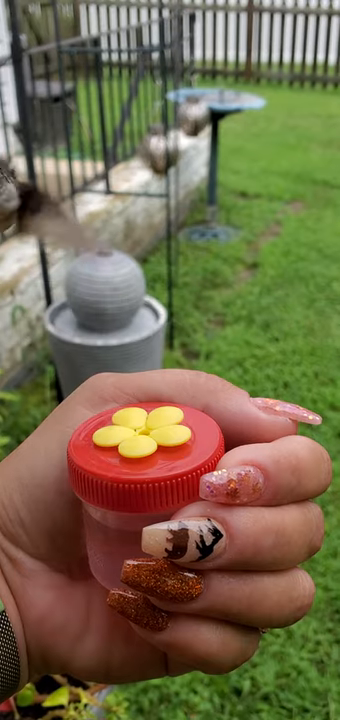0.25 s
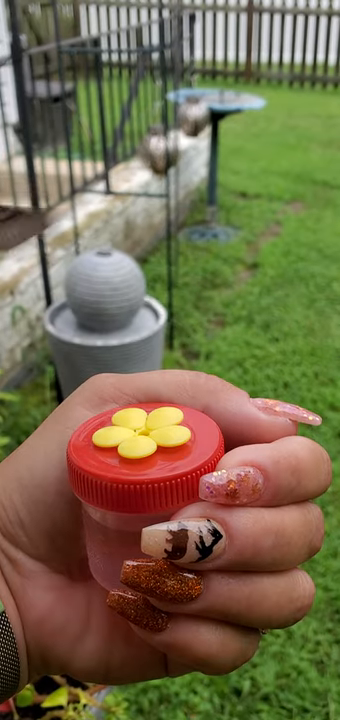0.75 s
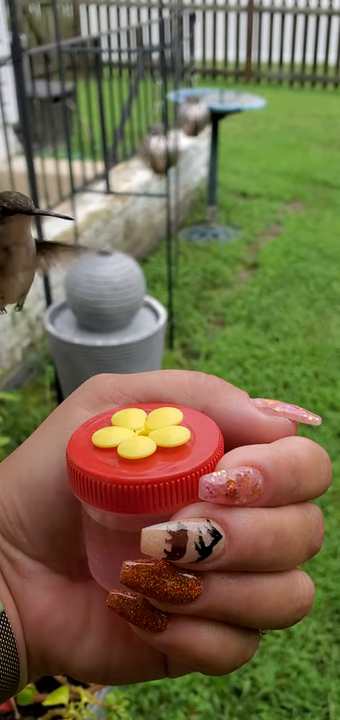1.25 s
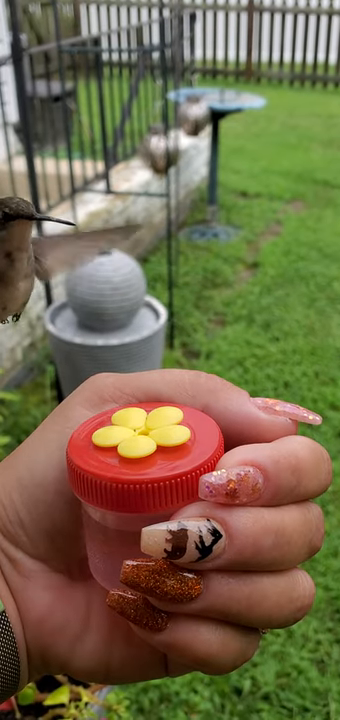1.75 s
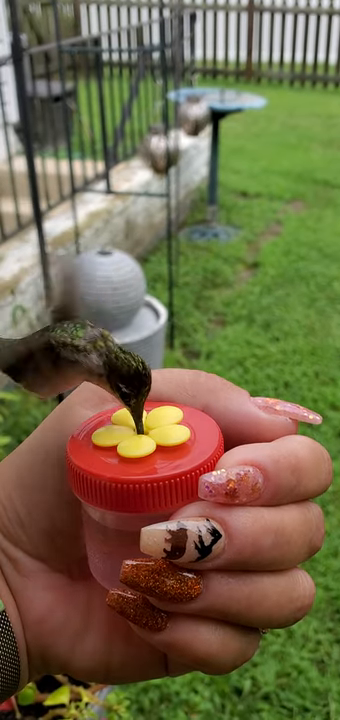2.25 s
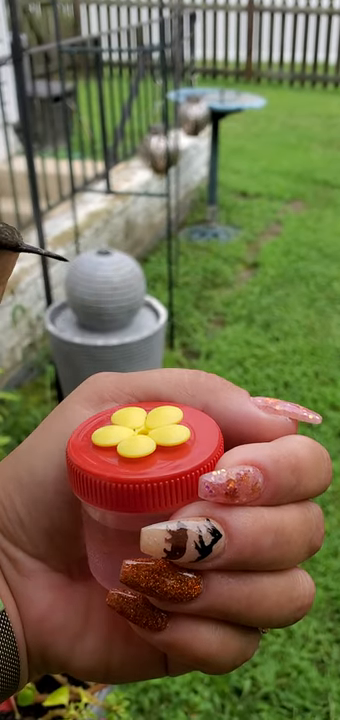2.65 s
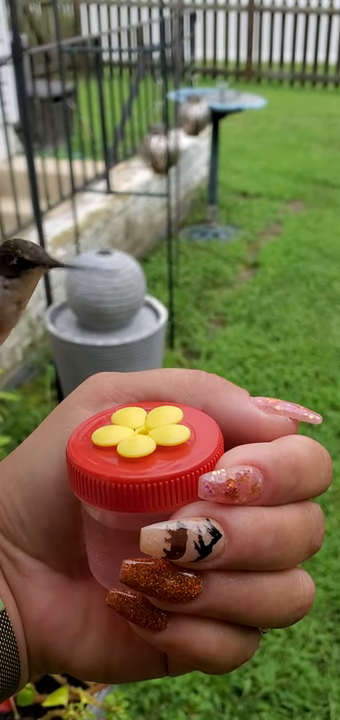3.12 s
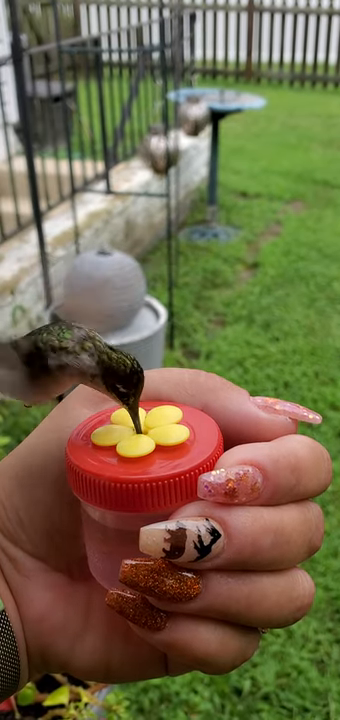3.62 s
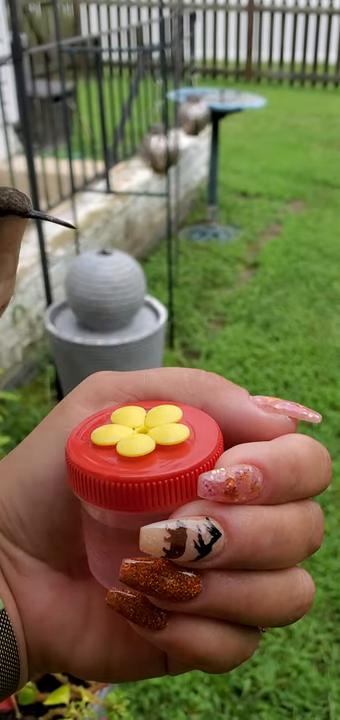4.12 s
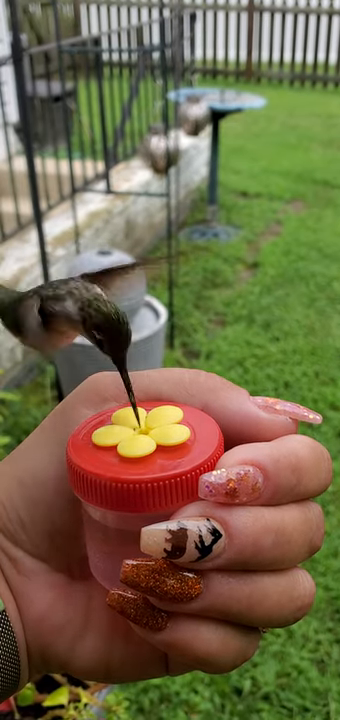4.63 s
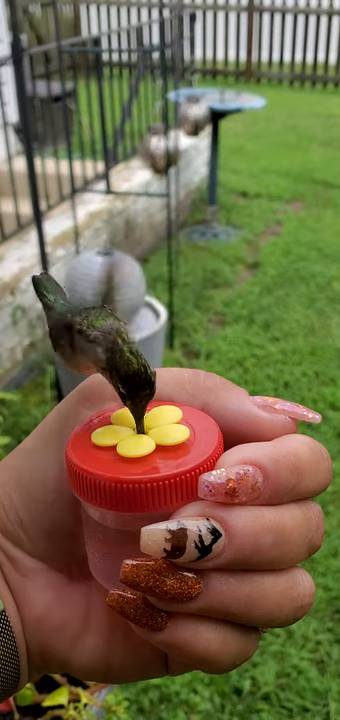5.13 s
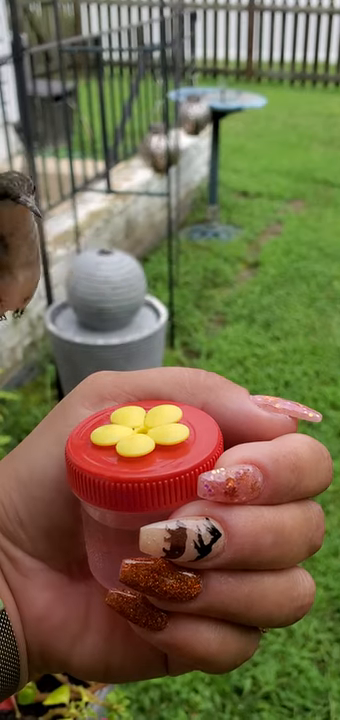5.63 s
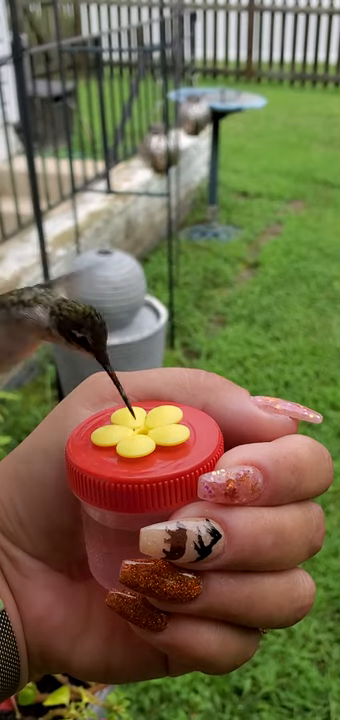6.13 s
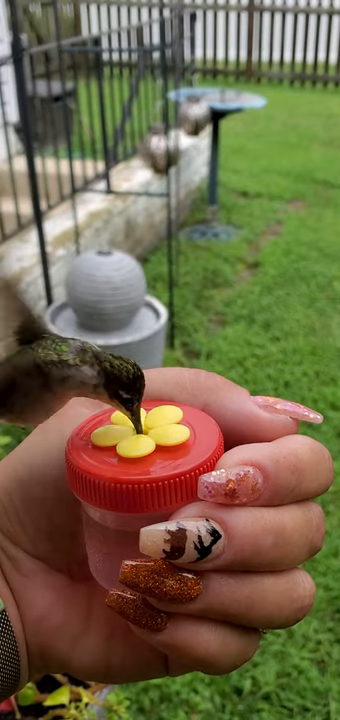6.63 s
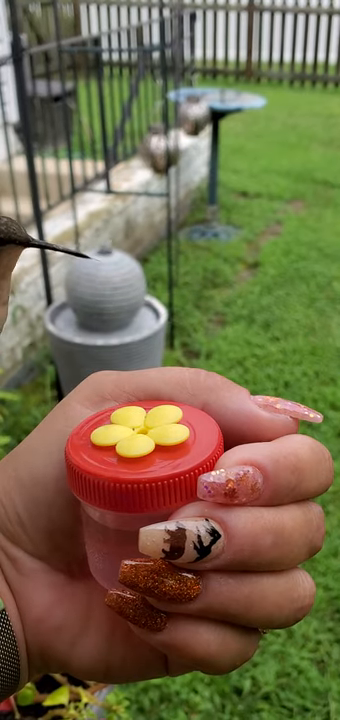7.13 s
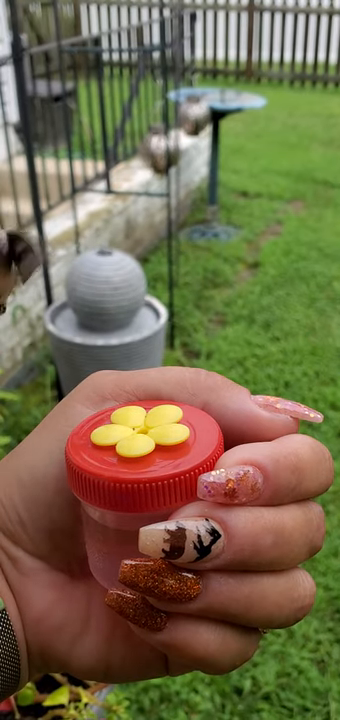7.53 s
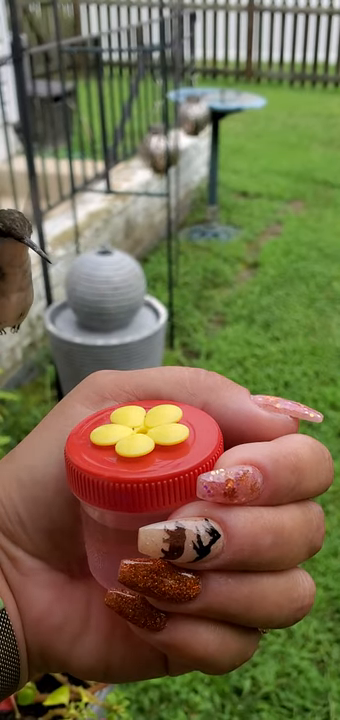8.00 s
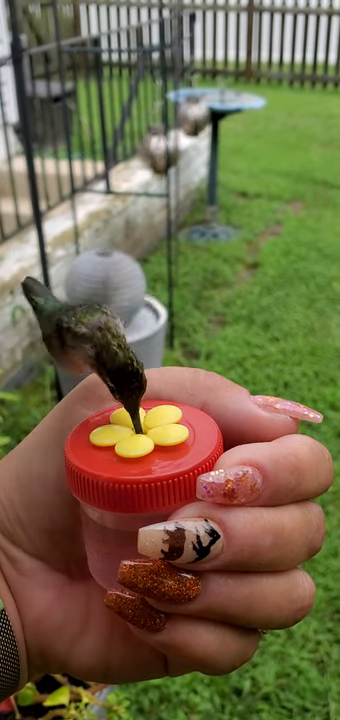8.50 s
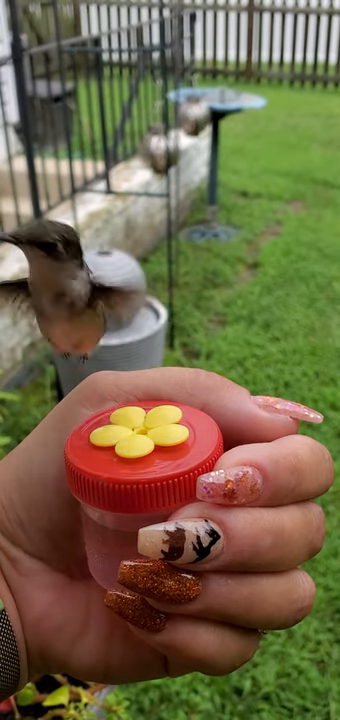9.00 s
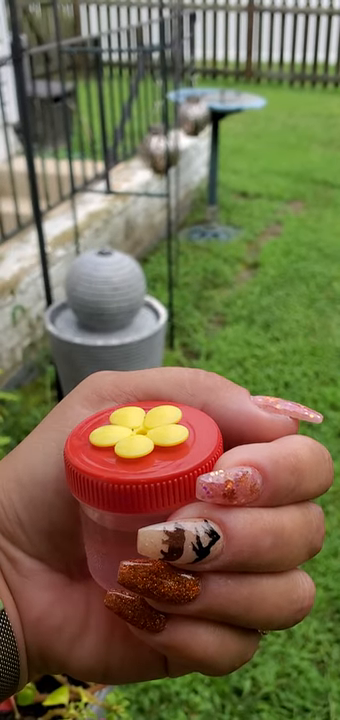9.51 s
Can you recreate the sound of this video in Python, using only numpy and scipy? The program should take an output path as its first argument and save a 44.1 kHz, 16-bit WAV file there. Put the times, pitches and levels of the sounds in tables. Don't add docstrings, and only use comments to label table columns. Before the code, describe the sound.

A hummingbird's wings hum low and throaty right beside the microphone, surging as it darts, with two sharp chips over faint crickets, then it leaves.

```python
import sys
import numpy as np
from scipy import signal
from scipy.fft import rfft, irfft, next_fast_len
from scipy.io import wavfile

SR = 44100
rng = np.random.default_rng(int(sys.argv[2]) if len(sys.argv) > 2 else 0)


def how_loud(loudness_db):
    steps = np.asarray(loudness_db, float) / 20
    return 10 ** steps


def int16_out(signal):
    q = np.round(np.clip(np.atleast_2d(signal).T, -1, 1) * 32767)
    wavfile.write(sys.argv[1], SR, q.astype(np.int16))


N = 430416


def unit(x):
    return x / np.sqrt(np.mean(x ** 2) + 1e-20)


def along(points, hz):
    f, v = np.transpose(points)
    return np.interp(np.log(hz + 1), np.log(f + 1), v)


def wobble(rate):
    knots = rng.standard_normal(int(N * rate / SR) + 4)
    return np.interp(np.arange(N) * rate / SR, np.arange(len(knots)), knots)


def rush(spectrum, alike, lean=((1, 0), (2, 0))):
    m = next_fast_len(N)
    hz = np.fft.rfftfreq(m, 1 / SR)
    common, difference = rng.standard_normal((2, m))
    turn = np.arccos(np.clip(alike, -1, 1)) / 2
    pair = np.cos(turn) * common + np.sin(turn) * np.outer([1, -1], difference)
    in_band = (hz > spectrum[0][0]) & (hz < spectrum[-1][0])
    gain = in_band * how_loud(along(spectrum, hz) + np.outer([.5, -.5], along(lean, hz)))
    lead = np.exp(1j * np.pi * np.outer([1, -1], hz) * 0.000265)
    return unit(irfft(rfft(pair) * gain * lead, m)[:, :N])


def wings():
    # multiple, left_db, right_db, right_lag_rad
    overtones = [(3, -8, -4.5, 1.18), (4, -4, -13.5, 2), (5, -5.5, -6, 0.4), (6, -13, -13, 2.1),
                 (7, -13.5, -10, 0.086), (8, -10.5, -21, 3), (9, -28, -28, 0.34), (10, -19.5, -28, 3.1)]
    # pitch_hz, density_db_per_hz
    wash = [(25, -34), (45, 7), (110, 2.5), (250, -1.5), (420, -12), (520, -21.5), (900, -23.5),
            (1400, -48)]
    # time_s, level_db
    gusts = [(.1, -46), (1.85, -56.5), (2.5, -49), (3.81, -51), (4.66, -51.5), (5.279, -47), (8.33, -51),
             (9.0, -49), (9.23, -48.5), (9.43, -48.5)]
    t = np.arange(N) / SR
    hz, stroke_db, share, left_db, right_db, lag, over_db = flight()
    phase = 2 * np.pi * np.cumsum(hz * (1 + 0.00385 * wobble(25))) / SR

    out = np.sqrt(2) * how_loud(stroke_db) * np.sin(phase) * np.array([share, np.ones(N)])
    lift_level = how_loud([left_db + 0.51 * wobble(13), right_db + 2.8 * wobble(14)])
    lift_lag = np.array([0 * lag, lag + 0.29 * wobble(6)])
    out += np.sqrt(2) * lift_level * np.sin(2 * phase + lift_lag)

    facing = np.clip(share, 0, 1) - .4
    odd_db = 3 * facing
    even_db = 0.76 * (left_db + 41.5) - 13 * facing
    for k, l_db, r_db, behind in overtones:
        drift = .5 * wobble(3)
        if k == 3:
            r_db = r_db + 1.23 * (stroke_db + 50.0)
        waver_db = 1.5 * np.array([wobble(4), wobble(4)])
        sway_db = np.array([l_db + waver_db[0], r_db + waver_db[1]])
        sway_db += odd_db if k % 2 == 1 else even_db
        out += np.sqrt(2) * how_loud(over_db + sway_db) * np.cos(k * phase + drift + np.array([[0], [behind]]))

    steady = how_loud(over_db - 10 + 2 * wobble(12))
    puffs = sum(how_loud(db) * np.exp(-.5 * ((t - at) / 0.054) ** 2) for at, db in gusts)
    half_strokes = 1 + 1.03 * np.cos(2 * phase)
    return out + (steady + puffs) * half_strokes * rush(wash, alike=0.95)


def flight():
    # time_s, beat_hz, facing, stroke_db, nearness_db
    hover = [(0, 48.6, 0.45, -49, 1), (.85, 49.3, 0.94, -48.5, -2), (1.1, 49, 0.46, -50.5, -1),
             (1.65, 46, 0.49, -47, -1), (2.1, 48, -0.15, -43.5, -1), (2.75, 49.8, 0.62, -47.5, 0.5),
             (2.95, 47.6, .3, -43, 2), (3.1, 48.6, -0.13, -47, 0.5), (3.45, 48, -0.19, -42.5, 1),
             (3.75, 48, -0.02, -51, 0.5), (4.35, 45.2, .6, -48.5, -1), (4.9, 48.6, .4, -42.5, 1.5),
             (5.9, 45.5, 0.38, -51.5, -0.5), (6.5, 48.4, -0.51, -52, 1.5), (7.25, 45.9, 0.66, -53.5, 0),
             (8.1, 45.5, 0.53, -49, -1), (8.75, 50, 0.18, -40.5, 0.5), (9.3, 49.5, -0.053, -57, -3)]
    # time_s, rise_hz, push_db, brace_db
    darts = [(.09, 2.5, 9.5, 4), (.31, 2.5, 4, 2.5), (.65, 2.4, -1, 2), (.98, 0, -3, 8),
             (1.079, 4.5, 0.5, -2), (1.5, 0, -2.5, 5.5), (1.73, 0, 0.5, 7), (1.89, 0, -1, 4),
             (1.969, 7, 4, 7.5), (2.49, 2, 1.5, -1), (2.61, 2.5, -1, -1.5), (3.02, 1, -7, 1),
             (3.26, 4.5, 0, 5.5), (3.82, 1, 4, 2.5), (4.06, 2, 4, 4), (4.47, 2.5, 2, 2.5),
             (4.671, 6, 0.5, 6), (5.27, .5, 4, -1), (5.51, 1.66, 4.5, 6), (6.03, 3, 4.5, -1),
             (6.19, 5.5, 6.5, 6), (6.82, 2, 5.5, 1), (7.36, 2.1, 5.5, 2.5), (7.81, -1, -2, 3),
             (7.88, 4, -5, -3), (8.33, 7, 5.5, 12), (8.52, 2, 3, -2), (9.0, 1, 9, 4), (9.23, 3.5, 7, 1.5),
             (9.43, 1, -3, 0.5)]
    rise_s, settle_s, push_s, brace_s, brace_lead_s = .04, .12, 0.038, 0.032, .12
    t = np.arange(0, N + 64, 64) / SR
    s, *cols = np.transpose(hover)
    hz, share, stroke_db, near_db = [np.interp(t, s, c) for c in cols]
    at, rise_hz, push_db, brace_db = np.transpose(darts)
    since = t[:, None] - at

    def bell(x, width):
        return np.exp(-.5 * (x / width) ** 2)

    hz = hz + np.where(since < 0, bell(since, rise_s), np.exp(-np.abs(since) / settle_s)) @ rise_hz
    push = bell(since, push_s) @ push_db
    tip = bell(since, brace_s) @ brace_db
    brace = bell(since + brace_lead_s, brace_s) @ brace_db
    gone_db = -92 * np.clip(t - 9.42, 0, None)

    stroke_db = stroke_db + push - 0.83 * brace + gone_db
    left_db = -39.5 + near_db + 0.44 * brace - tip + gone_db
    right_db = -48 - 7 * share + push - .6 * brace + .5 * gone_db
    lag = 3.93 - 0.54 * brace
    over_db = -54 + 6.5 * share + 0.41 * push - 0.21 * brace + .5 * gone_db
    controls = [hz, stroke_db, share, left_db, right_db, lag, over_db]
    return [np.interp(np.arange(N) / SR, t, c) for c in controls]


def chips():
    # start_s, length_s, level_db, right_port_db, brightness_db_per_octave
    calls = [
        (1.8468, 0.022, -37, 3.5, -0.5),
        (2.9593, 0.026, -35, -4.5, 0.5),
        (9.054, 0.014, -72.5, -8, 8.5),
        (9.613, .018, -62, -8, 5),
    ]
    # share_of_note, pitch_hz, level_db
    glide = [(0, 2216, -29), (.15, 2139, -7), (.45, 2100, 0.5), (.65, 1903, -1), (.83, 1720, -2),
             (1, 1500, -9.5)]
    # pitch_hz, level_db
    beak_left = [(1500, -2), (2100, -4), (4000, 3.5), (5200, -1.5), (6300, 7.5), (8300, 0), (10500, -13),
                 (12500, -28), (14700, -8)]
    beak_right = [(1500, 3.5), (2100, -5.5), (4000, 1.5), (6300, -14), (8000, -6), (10500, -5),
                  (12500, -51), (14700, -26)]
    out = np.zeros((2, N))
    part, glide_hz, swell_db = np.transpose(glide)
    t = np.arange(3000) / SR
    for s, length, db, right_db, bright_db in calls:
        u = np.linspace(0, 1, round(length * SR))
        hz = np.interp(u, part, glide_hz)
        phase = 2 * np.pi * np.cumsum(hz) / SR
        for port, (beak, side_db, late_s) in enumerate([(beak_left, 0, 0), (beak_right, right_db, .002)]):
            note = np.zeros(len(u))
            for k in range(1, 10):
                flutter_db = 2 * np.interp(u, np.linspace(0, 1, 9), rng.standard_normal(9))
                level = how_loud(along(beak, k * hz) + bright_db * np.log2(min(k, 4)) + flutter_db)
                note += level * np.cos(k * phase - 0.56 * k * k) * (k * hz < 15700)
            note *= 1 + 0.24 * rng.standard_normal(len(u))
            note *= how_loud(db + side_db + np.interp(u, part, swell_db)) * np.clip(12 * u * (1 - u), 0, 1)
            scatter = how_loud(-41.5 - 60 * t / 0.12) * rng.standard_normal(len(t))
            scatter[0] = 1
            heard = signal.fftconvolve(note, scatter)
            out[port, round((s + late_s) * SR):][:len(heard)] += heard
    return out


def ticks():
    # start_s, peak_db, pitch_hz, ring_t60_s, left_minus_right_db
    contacts = [(5.62, -51, 8990, .002, 0), (7.04, -51, 1520, 0.02, 0), (6.8, -53, 2170, 0.03, 0),
                (2.8, -50, 8000, .006, 10), (5.7, -51, 11000, .004, 5), (4.28, -56, 4530, .01, 3),
                (6.81, -54, 2680, .02, 0), (8.184, -54.5, 4800, 0.019, 6), (8.501, -43, 8010, 0.0062, 5),
                (8.522, -51, 11000, .002, 5), (8.568, -46, 10000, 0.0021, 5), (8.574, -53, 3850, 0.0043, 8),
                (8.577, -53, 2820, 0.023, 15), (9.192, -50, 1900, 0.034, 9), (9.271, -48, 15280, 0.0042, 4),
                (9.291, -48, 14500, .002, 8), (9.311, -49, 14740, 0.0029, 8), (9.33, -52, 13990, 0.0019, 8),
                (9.546, -45, 14500, 0.0048, 3)]
    out, t = np.zeros((2, N)), np.arange(1500) / SR
    for s, db, hz, t60, pan_db in contacts:
        attack = np.minimum(t / (0.019 * t60), 1)
        ring = how_loud(-60 * t / t60) * np.sin(2 * np.pi * hz * t) * attack
        crackle = 0.43 * (t60 < .01) * how_loud(-60 * t / 0.031) * np.diff(rng.standard_normal(len(t) + 1))
        out[:, round(s * SR):][:, :len(t)] += how_loud([[db + pan_db / 2], [db - pan_db / 2]]) * (ring + crackle)
    return out


def phrases(rows):
    return np.concatenate([np.linspace(a, b, round(n)) for a, b, n in rows])


def cricket(times, hz, width_hz, length, pulse_hz, db, lean_db):
    gate = np.zeros(N)
    swell = np.hanning(round(length * SR)) ** 0.49
    beat = (.5 + .5 * np.cos(2 * np.pi * pulse_hz * np.arange(len(swell)) / SR)) ** 0.5
    for s in np.ravel(times):
        a = max(round(s * SR) - len(swell) // 2, 0)
        gate[a:a + len(swell)] += (how_loud(rng.normal(0, 0.5)) * swell * beat)[:N - a]
    gate += 0.13 * np.roll(gate, round(.11 * SR))
    resonance = [(hz - 3 * width_hz, -35), (hz - width_hz, -6), (hz, 0),
                 (hz + width_hz, -6), (hz + 3 * width_hz, -35)]
    ring = rush(resonance, alike=0.13)
    return how_loud([[db + lean_db / 2], [db - lean_db / 2]]) * gate * ring


def insects():
    # pitch_hz, density_db_per_hz
    chorus_bands = [(5450, -23), (5750, -4.5), (6100, 1.5), (6700, -2), (7100, -5.5), (7500, -53)]
    # first_chirp_s, last_chirp_s, chirps
    near = [(.03, .94, 5), (1.27, 2.99, 7), (3.28, 4.43, 6), (4.64, 6.15, 8), (6.38, 8.85, 12),
            (9.05, 9.69, 4)]
    far = [(.11, 1.86, 9), (2.12, 4.12, 10), (4.3, 4.71, 3), (4.93, 6.08, 6), (6.29, 7.42, 6),
           (7.62, 9.69, 11)]
    slow = [(.31, 1.07, 3), (1.52, 4.13, 8), (4.72, 5.75, 4), (6.17, 8.13, 6), (8.6, 9.45, 3)]
    quick = [(.11, 4.16, 37), (4.27, 5.3, 10), (5.41, 5.91, 5), (6.02, 9.67, 33)]
    shimmer = how_loud(-59 + 0.84 * wobble(1.53) + 0.96 * wobble(60))
    out = shimmer * rush(chorus_bands, alike=0.13, lean=[(5900, 4.8), (6900, 1.6)])
    out += cricket(phrases(near), 9050, 90, length=0.098, pulse_hz=114.6, db=-62.0, lean_db=-3)
    out += cricket(phrases(far), 9300, 130, length=0.0884, pulse_hz=114, db=-65.5, lean_db=-11.0)
    out += cricket(phrases(near) - .01, 8740, 220, length=0.15, pulse_hz=120, db=-72.5, lean_db=5.0)
    out += cricket(phrases(quick), 8200, 150, length=0.05, pulse_hz=110, db=-68, lean_db=9)
    out += cricket(phrases(slow), 6034, 160, length=0.277, pulse_hz=32.05, db=-58.0, lean_db=6.5)
    return out


def compressor():
    # multiple, left_db, right_db, loudest_s, fade_period_s
    lines = [(9, -81, -84, 0, 55), (10, -73, -85, 4, 60), (11, -69.5, -81, 12, 100),
             (12, -71.5, -71.5, 3.5, 4.6), (14, -80.5, -97, 7, 16), (17, -81.5, -86, 4, 13),
             (20, -71.5, -73.5, 2.36, 5.2), (21, -69.5, -72, 5.5, 7.6), (22, -79.5, -77.5, -3, 4.4),
             (23, -80, -68, 1.5, 9.4), (24, -71.5, -95.5, 8.5, 12.6), (25, -76, -103, 2.6, 5.1),
             (26, -69.5, -82, 0, 22), (27, -78, -74, 10.5, 20)]
    buzz_hz = 120.02
    echo = np.array([[.62], [.4]])
    t, out = np.arange(N) / SR, np.zeros((2, N))
    for k, l_db, r_db, at, period in lines:
        drift = 2 * np.pi * (t - at) / period
        fade = np.sqrt(1 + echo ** 2 + 2 * echo * np.cos(drift)) / (1 + echo)
        level = fade * how_loud([l_db + 1.2 * wobble(1.24), r_db + 1.6 * wobble(1.24)])
        offset = .7 * rng.standard_normal() + .4 * rng.standard_normal((2, 1))
        out += np.sqrt(2) * level * np.sin(2 * np.pi * k * buzz_hz * t + offset)
    return out


def yard():
    # pitch_hz, density_db_per_hz
    traffic = [(15, -77), (25, -21), (81, 6.5), (172, -8), (204, -6), (227, -6.5), (435, -12.5),
               (531, -30.5), (1000, -24), (1300, -70), (2200, -120)]
    # pitch_hz, density_db_per_hz
    hiss = [(400, -2.5), (780, -0.5), (1010, -11.5), (1330, -2), (1810, -11.5), (2450, -7), (3220, -13),
            (3770, -15.5), (5400, -14.5), (7200, -9.5), (7900, -16), (9240, -8.5), (10200, -17.5),
            (15800, -7)]
    # pitch_hz, left_minus_right_db
    hiss_lean = [(700, 1), (1290, 4), (2380, 2), (3900, 3.5), (5300, 7), (6300, 4), (7900, 9), (9000, 2),
                 (15000, 9)]
    rumble = how_loud(-49.5 + 1.14 * wobble(2.502)) * rush(traffic, alike=0.99)
    return rumble + how_loud(-58.0 + 0.42 * wobble(3)) * rush(hiss, alike=0.24, lean=hiss_lean)


def scene():
    return wings() + chips() + insects() + compressor() + ticks() + yard()


def band_limit(x):
    return signal.sosfilt(signal.butter(12, 15910, fs=SR, output="sos"), x)


def record(dry):
    return band_limit(dry)


dry = scene()
out = record(dry)
int16_out(out)
```